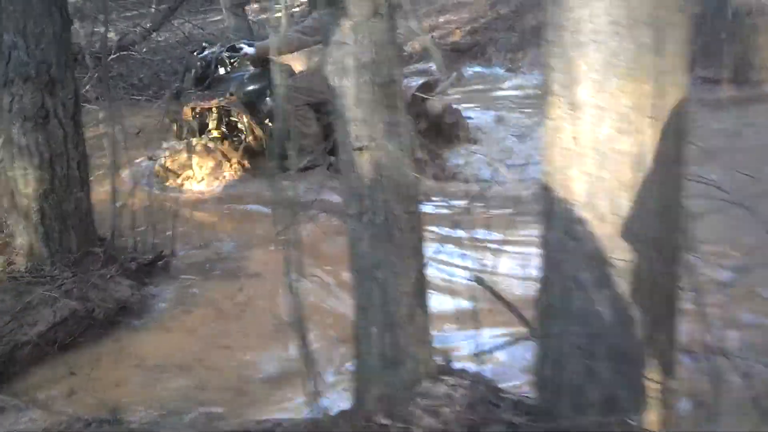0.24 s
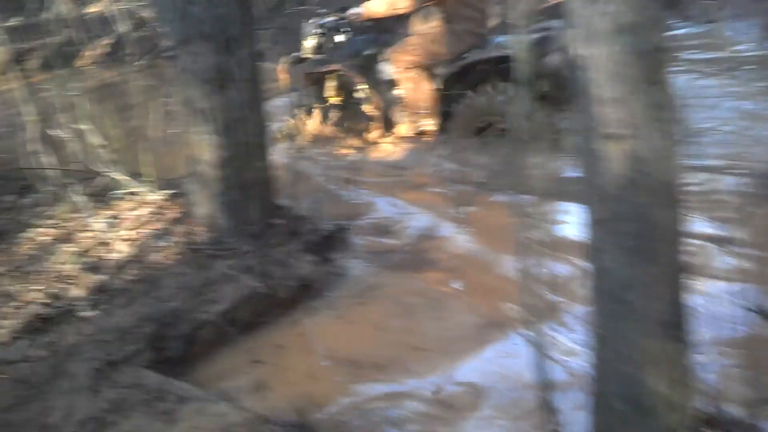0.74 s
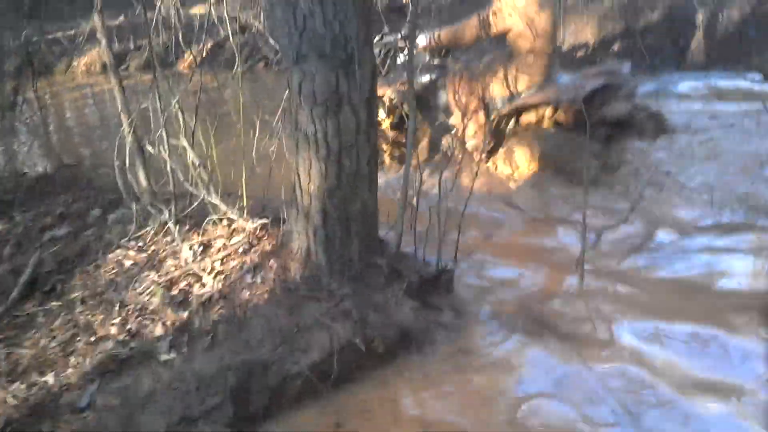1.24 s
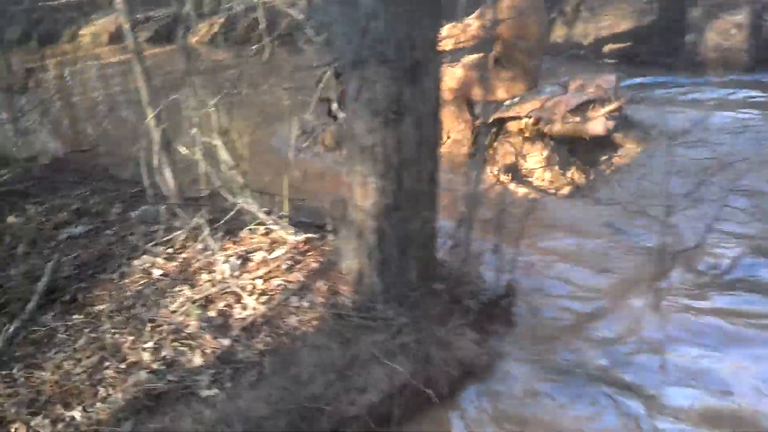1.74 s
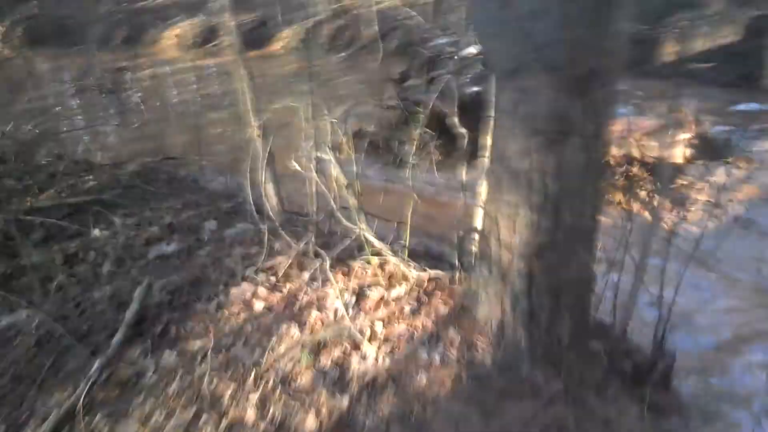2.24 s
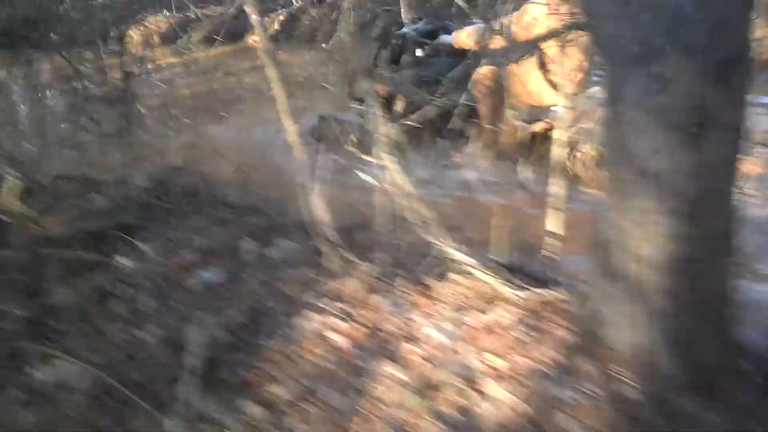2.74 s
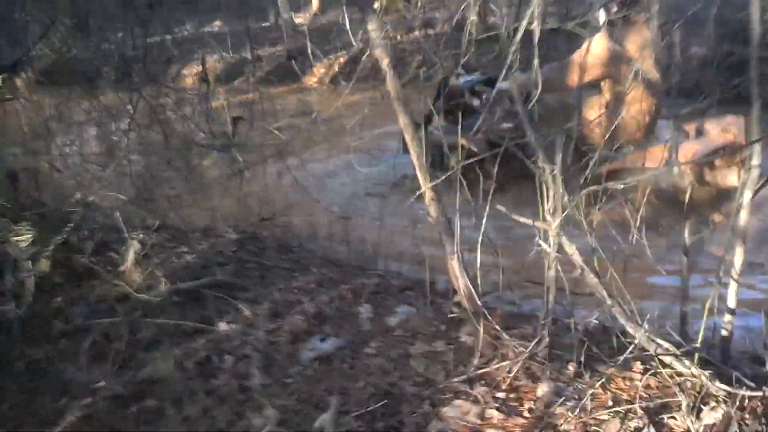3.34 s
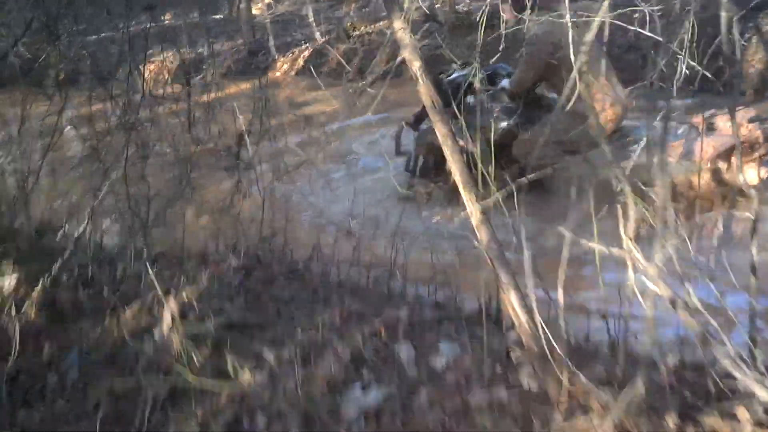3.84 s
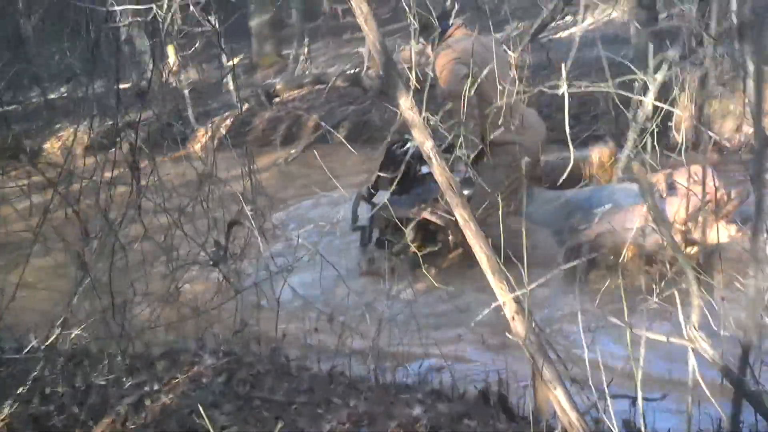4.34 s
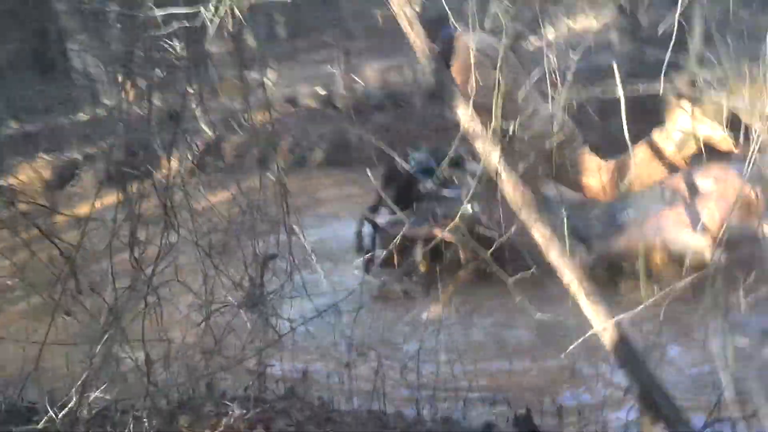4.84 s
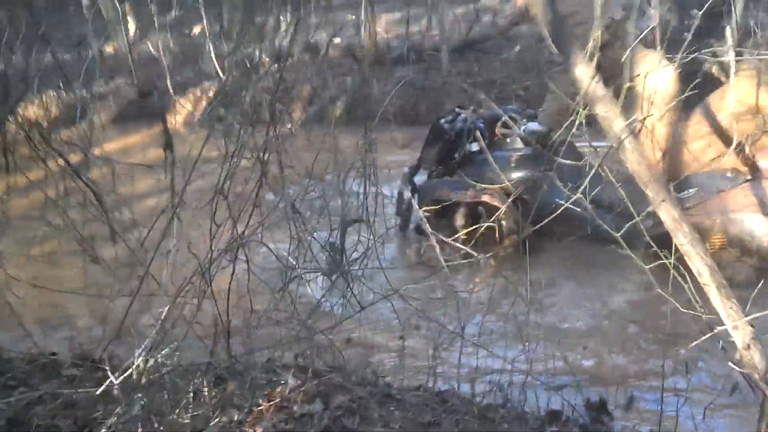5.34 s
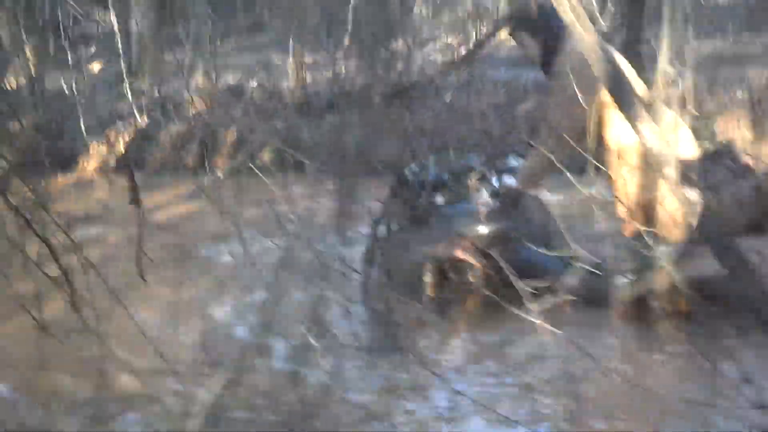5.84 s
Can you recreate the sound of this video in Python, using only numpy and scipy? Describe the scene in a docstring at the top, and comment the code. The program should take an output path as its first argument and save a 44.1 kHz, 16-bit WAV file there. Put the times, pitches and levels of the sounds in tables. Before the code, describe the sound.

A twin-cylinder quad bike wades through a muddy creek, heard from a few metres away. From 0 to 0.9 s the engine growls at middling revs with uneven throttle jabs, a faint thin falling whistle at the very start and a hoarse howl around 0.5-1.2 s. It climbs to a full, throaty roar near 1.2 s, holds until 1.6 s, then drops briefly into a weak burble. At 1.8 s it surges again with wet, crackling spits, roaring highest around 2.4 s. From 2.8 s it winds down, settling by 3.3 s into a slow, lumpy idle with uneven thumps, ticks and spitting water. Sloshing, gurgling and spray show more clearly here, swelling near 3.7 and 5.2 s. From 5.65 s the revs rise again with a gruff growl and heavier slosh to the end. Trees add a faint, short echo.

```python
"""A muddy creek in a wood: a V-twin quad bike wades through, a few metres from two close microphone ports.
The throttle is blipped again and again, the engine drops to a loping idle and picks up again.
Uneven exhaust puffs ring the pipe and spit through mud: summed engine orders, filtered pulses, gated noise.
The wheels churn the water, made of noise and ringing bubbles; the trunks send back a faint echo cloud."""
import sys
import numpy as np
from scipy import signal
from scipy.fft import rfft, irfft
from scipy.io import wavfile
from scipy.ndimage import uniform_filter1d

SR = 44100
rng = np.random.default_rng(int(sys.argv[2]) if len(sys.argv) > 2 else 0)


def output_pcm(signal):
    """Save a mono or channel-first signal as 16-bit PCM at the path in sys.argv[1].

    Samples are clipped to [-1, 1] before scaling.
    """
    pcm = np.clip(np.atleast_2d(signal).T, -1, 1) * 32767
    wavfile.write(sys.argv[1], SR, np.round(pcm).astype(np.int16))


N = 269010

# crank speed before idle hunting: time_s, speed_rpm
CRANK_SPEED = [(0, 2666), (.09, 2614), (.22, 2950), (.38, 2756), (.54, 2587), (.76, 3059), (.92, 2738),
               (1, 3004), (1.23, 3852), (1.49, 3371), (1.64, 3351), (1.72, 2807), (1.81, 2334),
               (1.92, 3150), (2.07, 3828), (2.25, 3678), (2.43, 4027), (2.6, 3614), (2.77, 3308),
               (2.87, 2611), (2.98, 2096), (3.12, 1790), (3.26, 1610), (3.46, 1595), (3.8, 1603),
               (4.1, 1637), (4.4, 1611), (4.8, 1637), (5.37, 1649), (5.65, 1641), (5.78, 1905), (5.9, 2249),
               (6.1, 2441)]
TIME, HZ = np.arange(N) / SR, np.arange(N // 2 + 1) * SR / N
RPM = np.interp(TIME, *np.transpose(CRANK_SPEED))
CYCLE_START = .213  # place in the four-stroke cycle at the start, 0-1
# at idle the crank speed hunts, so that the strokes come a little early or late
HUNT_CYCLES, HUNT_PER_S = .007, 7
# the rider opens the throttle: start_s, end_s, opening (0-1)
BLIPS = [(-.1, 0.867, 0.71), (0.495, 0.747, 0.88), (0.887, 1.613, 0.99), (1.776, 2.765, 0.9),
         (5.62, 6.2, 0.44)]
IDLE_THROTTLE, OPEN_S, CLOSE_S = 0.331, 0.0946, 0.19
# throttle snapped shut, the engine coasts and fires weakly:
# start_s, end_s, recovery_s, overall_loss_db, further_note_loss_db, burble_rise_db
COASTS = [(1.647, 1.849, 0.012, 9.5, 3.5, 16), (2.784, 3.273, 0.25, 5.5, 0.5, 13.5)]
COAST_ONSET_S = 0.063
# the tailpipe blows itself clear of the mud:
# start_s, end_s, strength (ratio), wetness (-1 dry to 1 wet), bark_change_db
SURGES = [(0.035, 0.224, 0.53, 0.34, -3), (0.511, 0.742, 0.41, 0.57, -1.5), (0.92, 1.236, 0.61, 0.89, -9.5),
          (1.39, 1.628, 0.43, 0.6, 3.5), (1.797, 2.071, 0.58, 0.93, 1), (2.184, 2.434, 0.93, 0.72, -1),
          (2.53, 2.785, 0.28, -0.48, 4), (5.632, 6.151, 0.66, 0.11, -3)]
SURGE_ATTACK_S, SURGE_RELEASE_S = 0.067, 0.063
# how the engine runs: start_s, end_s, way (name)
RUNNING = [(-.1, 0.954, "part"), (0.917, 2.788, "full"), (2.786, 2.907, "part"), (2.933, 3.203, "lugging"),
           (3.19, 5.728, "idle"), (5.72, 6.2, "lugging")]
CHANGE_S = 0.074

# gas pulses in one four-stroke cycle, blended by throttle opening:
# place_at_zero (cycles), place_at_full (cycles), level_at_zero_db, level_at_full_db,
# spit_db, extra_hardness_at_zero_db
PUFFS = [(.042, -0.038, 6, -4.5, 4, 8.5), (.198, 0.19, 0.5, -2.5, -14.5, 4), (.365, .347, 4, 1.5, 0, -11.5),
         (.73, .662, 6, -4, -5, -10.5)]
# thrusts of the two cylinders and their returns in the pipe, by way of running, sharpest first:
# place (cycles), relative_level_db
THRUSTS = {"idle": [(.06, 0.5), (.15, -3.5), (.31, -8.5), (.46, -1), (.545, -5.5), (.62, -1.5), (.70, 1)],
           "lugging": [(.07, 0), (.45, 3), (.57, -2.5), (.68, 1.5)], "part": [(.425, -1), (.575, 1),
           (.68, 0), (0.06, -1.5)], "full": [(.43, 2), (0.11, 1), (.58, -2.5), (0.1, -14)]}
# exhaust note, scaled to the same total for each way of running: order (multiple of the cycle rate),
# idle_relative_db, lugging_relative_db, part_throttle_relative_db, full_throttle_relative_db
ORDERS = [(3, -46, -45, -34, -30), (4, -43, -35, -20, -12), (5, -19, -10, -2, -6), (6, -23, -11, -1, 0),
          (7, -20, -10, -12, -7), (8, -8, -6, 0, -10), (9, -11, -4, -3, -15), (10, -14, 1, -4, -10),
          (11, -1, -5, -3, -7), (12, -7, -4, -8, -6), (13, 0, -4, -6, -3), (14, -9, -11, -14, -16),
          (15, -5, -4, -2, -16), (16, -8, -5, -5, -16), (17, -12, -14, -15, -13), (18, -14, -3, -14, -13),
          (19, -12, -7, -17, -13), (20, -12, -10, -16, -16), (21, -9, -13, -13, -13),
          (22, -16, -21, -21, -13), (23, -14, -16, -21, -16), (24, -15, -20, -20, -17),
          (25, -10, -19, -18, -19), (26, -23, -20, -18, -16), (27, -19, -25, -15, -17),
          (28, -23, -23, -16, -19), (29, -21, -29, -18, -23), (30, -28, -17, -16, -24),
          (31, -28, -21, -20, -26), (32, -26, -21, -19, -30)]
# under load the silencer delays the upper orders more and more, so that they fuse into a roar
SMEAR_FROM_ORDER = 14
SMEAR_RAD = {"idle": .012, "lugging": .05, "part": .12, "full": .2}  # radians per order squared
WAVER_DB, WAVER_RAD = .8, .08
HONK_FROM_HZ, HONK_WIDTH_HZ, BASS_CUT_HZ = 224, 25, 81
# the highest orders bark out in a surge; the last value is per surge strength
BARK_FROM_HZ, NOTE_BARK_DB, NOTE_BARK_SURGE_DB = 677, -6, 7.5
# silencer resonances that the orders glide through, swelling and fading: pitch_hz, gain_db
SILENCER = [(110, 0.5), (150, -0.5), (190, 1.5), (220, 2), (250, 0), (325, 1.5), (365, 2.5), (402, 0.5),
            (428, -4), (460, 0.5), (540, 4.5), (620, -0.5), (700, -2), (757, 4.5), (820, 1), (960, -1)]
# resonances of exhaust pipe and silencer: pitch_hz, width_hz, gain_db
PIPE = [(120, 11, -24), (152.6, 26, -7.5), (173, 45, -3), (189, 28, 0.5), (272, 39, -5.5), (336.7, 11, -1),
        (345, 5.7, -4.5), (383, 4.5, -13), (450, 80, -17), (555.5, 11, -6), (596.3, 11.3, -7.5),
        (664, 26, -19), (734.1, 14.7, -6.5), (877, 144, -9.5), (1206, 7.9, -15), (1310, 32, -18),
        (2000, 640, -16.5)]

# exhaust registers, one row each before coasting and surge changes:
# idle_level_db, throttle_rise (db per opening), surge_rise (db per strength), wet_rise (db per wetness)
BOOM_LAW = (-26, 0.5, 4, 0.9)  # the whole note
HONK_LAW = (0, -3, 3.5, -0.5)  # upper orders, relative to the boom
DRONE_LAW = (-40, -8, 10, -9)
BARK_LAW = (-46.5, 2, 12.5, 5)
SNARL_LAW = (-54, 13, 14.5, -7)
RASP_LAW = (-53.5, 17, -9.5, 13)
BURBLE_LAW = (-42, -11, 0, 0)
SPIT_LAW = (-47.5, -12.5, 6, 13.5)
# the gas gets rougher while the crank speeds up hard: the full rise comes at this rate
SPIN_UP_DB, SPIN_UP_RPM_PER_S = 12, 4500
# rushing gas in the pipe, spectrum: pitch_hz, relative_density (db per Hz)
RASP = [(300, -50), (600, -16), (760, 1), (1000, -3), (1350, -4), (1650, -12.5), (2100, -16.5), (2700, 20),
        (5000, -28)]
# a howl flares up near 1.3 kHz and glides: start_s, end_s, start_hz, end_hz, width_hz, level_db
HOWLS = [(0.506, 0.772, 1430, 1356, 189, -34), (0.582, .73, 1220, 1213, 110, -34),
         (.78, 1.03, 1370, 1370, 129, -39), (1.054, 1.21, 1388, 1445, 45, -35.5),
         (5.823, 5.927, 1430, 1460, 70, -45)]
HOWL_RISE_S, HOWL_FALL_S = 0.097, 0.086

# gas tearing through mud, spectrum: pitch_hz, relative_density (db per Hz)
SPIT = [(900, -9.5), (2000, 4), (3200, 3), (4400, 3), (6500, -2.5), (9500, -7), (12000, -12), (16000, -11)]
# the loudest slugs of water blown from the tailpipe: time_s, relative_peak_db
BIG_SLUGS = [(0.171, -38), (0.212, -38.5), (0.657, -38), (0.9793, -31), (1.022, -31.5), (1.536, -36),
             (1.607, -35), (1.855, -28.5), (1.8945, -26), (1.936, -33), (2.327, -31), (2.358, -30.5),
             (3.5187, -43), (3.747, -41), (3.9757, -38.5), (4.263, -38.5), (4.559, -38), (4.8561, -40),
             (4.9283, -38.5), (5.074, -37), (5.435, -43), (5.655, -48), (5.7267, -35.5), (5.8491, -30.5),
             (6.008, -38), (6.0576, -35)]
# smaller slugs follow each cycle's main puff; their peaks stand above the spitting, less so under load
SLUG_LAG_S, SLUG_DB, SLUG_LOAD_DB, SLUG_SPREAD_DB = 0.0016, 10, -31, 8
# water slugs, spectrum: pitch_hz, relative_density (db per Hz)
CRACK = [(300, -40), (800, 8), (2000, 8.5), (3200, 1.5), (4400, 1), (6500, -2), (9500, -5.5), (12000, -13),
         (16000, -13)]
# thin whistles: start_s, end_s, start_hz, end_hz, level_db, waver_hz
WHISTLES = [(-.05, 0.144, 500, 420, -29.5, 6.8)]

# churned water: level at idle and change per throttle opening
SLOSH_DB, SLOSH_LOAD_DB = -43.5, 5
SPRAY_DB, SPRAY_LOAD_DB = -54.5, 1.5
# the bow wave breaks: start_s, end_s, slosh_change_db, spray_change_db
WAVES = [(3.65, 3.82, 4.5, 8), (5.115, 5.438, 0.7, 9), (5.613, 6.1, 6.5, -10)]
WAVE_RISE_S, WAVE_FALL_S = 0.18, 0.2
# mud flung up by the wheels lands: time_s, relative_level_db, decay_s
SPLATS = [(0.127, -70.5, 0.024), (3.84, -72, 0.0095), (3.976, -65, 0.015), (5.33, -72, 0.033),
          (5.63, -74, 0.026)]
# sloshing water, spectrum: pitch_hz, relative_density (db per Hz)
SLOSH = [(20, -32), (60, -11), (150, -42), (400, 6), (750, 1.5), (1200, -4), (2200, -13), (4000, -21),
         (9000, -45)]
# spray and mud, spectrum: pitch_hz, relative_density (db per Hz)
SPRAY = [(1000, -24), (2500, -12), (4400, 3.5), (7000, -3), (9500, -0.5), (12000, -8), (16000, -1)]

# microphone pair, lead of the left side on top of the port lag: pitch_hz, phase (radians)
SKEW = [(20, 0), (130, -.25), (330, .42), (420, .6), (500, 1.05), (585, 3.1), (650, 3.5), (700, 4),
        (1000, 3.8), (1500, 2.85), (1620, 3.8), (1850, 3.9), (2100, 2.7), (2500, 3.3), (2800, 3.14)]
# microphone pair: pitch_hz, left_minus_right_db
BALANCE = [(70, 3), (140, .8), (210, .5), (330, 2.2), (500, 5), (770, 3), (1170, .3), (1800, -1.2),
           (2800, -.3), (4200, -.8), (7000, 0)]
PORT_LAG_S = .000362
CUTOFF_HZ = 16000


def throttle_opening():
    """The throttle rests at idle between blips."""
    blips = [(opening - IDLE_THROTTLE) * swell(start, end, OPEN_S, CLOSE_S)
             for start, end, opening in BLIPS]
    return np.clip(IDLE_THROTTLE + np.max(blips, axis=0), 0, 1)


def loudness(load):
    """Register levels in dB follow load and surges; while coasting the note gives way to burble."""
    strength, wetness, bark_db = sum(
        np.outer(amounts, swell(start, end, SURGE_ATTACK_S, SURGE_RELEASE_S))
        for start, end, *amounts in SURGES)
    loss_db, note_loss_db, burble_db = sum(
        np.outer(db, swell(start, end, COAST_ONSET_S, recovery_s))
        for start, end, recovery_s, *db in COASTS)
    laws = (BOOM_LAW, DRONE_LAW, BARK_LAW, SNARL_LAW, RASP_LAW, SPIT_LAW, BURBLE_LAW, HONK_LAW)
    boom, drone, bark, snarl, rasp, spitting, burbling, honk = [
        idle_db + load_db * load + surge_db * strength + wet_db * wetness - loss_db
        for idle_db, load_db, surge_db, wet_db in laws]
    spin_up = np.clip(np.gradient(RPM) * SR / SPIN_UP_RPM_PER_S, 0, 1)
    burbling = burbling + burble_db + SPIN_UP_DB * spin_up
    note_bark_db = NOTE_BARK_DB + NOTE_BARK_SURGE_DB * strength + bark_db
    # honk is relative to the boom, which already carries the coasting loss
    return (boom - note_loss_db, honk + loss_db, note_bark_db, burbling,
            drone, bark + bark_db, snarl, rasp, spitting)


def firing(cycle, throttle, uneven_db, spit_uneven_db, jitter_s):
    """Pressure pulses, their hard fronts and gas jets; throttle shifts their places and sizes."""
    pressure, fronts, jets = np.zeros((3, N))
    count = np.arange(int(cycle[-1]) + 1)
    opening = np.interp(count, cycle, throttle)
    for idle_place, load_place, idle_db, load_db, spit_db, hard_db in PUFFS:
        chance = rng.standard_normal((len(count), 3))
        place = (1 - opening) * idle_place + opening * load_place
        when = np.interp(count + place, cycle, TIME, left=-1, right=-1)
        when = when + jitter_s * (1 - opening) * chance[:, 0]
        size = (1 - opening) * from_db(idle_db) + opening * from_db(load_db)
        size = size * from_db(uneven_db * chance[:, 1])
        pressure += clicks(when, size)
        fronts += clicks(when, size * from_db(hard_db * (1 - opening)))
        jets += clicks(when, from_db(spit_db + spit_uneven_db * chance[:, 2]))
    return pressure, fronts, jets


def order_phasors(soft_order):
    """Thrust places set the phase of each order, one set of complex orders per way of running."""
    orders, *columns = np.transpose(ORDERS)
    notes = []
    for (way, thrusts), db in zip(THRUSTS.items(), columns):
        hard, *soft = [from_db(size_db) * np.exp(-2j * np.pi * orders * place)
                       for place, size_db in thrusts]
        # softer thrusts matter less in the upper orders
        timing = np.angle(hard + sum(soft) * np.exp(-(orders / soft_order) ** 2))
        timing = timing - SMEAR_RAD[way] * np.maximum(orders - SMEAR_FROM_ORDER, 0) ** 2
        notes.append(from_db(db) / np.linalg.norm(from_db(db)) * np.exp(1j * timing))
    return orders, np.transpose(notes)


def exhaust_note(cycle, boom_db, honk_db, bark_db, soft_order):
    """Wavering engine orders crossfade with the way of running; surges lift the upper ones."""
    orders, notes = order_phasors(soft_order)
    shares = np.array([sum(swell(start, end, CHANGE_S, CHANGE_S)
                           for start, end, way in RUNNING if way == name) for name in THRUSTS])
    out, turn = 0, np.exp(2j * np.pi * cycle)
    wave = turn ** int(orders[0])
    for order, note in zip(orders, notes):
        hz = order * RPM / (2 * 60)  # one cycle takes two crank turns
        upper = np.clip((hz - HONK_FROM_HZ) / HONK_WIDTH_HZ, 0, 1)
        highest = np.clip((hz - BARK_FROM_HZ) / HONK_WIDTH_HZ, 0, 1)
        passing_db = np.interp(hz, *np.transpose(SILENCER))
        gain = from_db(upper * honk_db + highest * bark_db + passing_db + WAVER_DB * drift(14))
        gain = gain / np.sqrt(1 + (BASS_CUT_HZ / hz) ** 10)
        out = out + gain * ((note @ shares) * wave * (1 + 1j * WAVER_RAD * drift(14))).real
        wave = wave * turn
    return np.sqrt(2) * from_db(boom_db) * out


def ring_pipe(x):
    """The resonances of pipe and silencer."""
    return sum(resonate(x, hz, width) * from_db(db) for hz, width, db in PIPE)


def exhaust(cycle, pressure, fronts, jets, throttle, levels_db, baffle_share, rush_db):
    """The hard fronts of the pulses rattle between the baffles and mix with rushing gas."""
    hard = ring_pipe(fronts)
    rattle = -.5 * hard + baffle_share * (.4 + .6 * throttle) * scatter(hard, decay_s=.009)
    flow = fade(jets, decay_s=0.0068) + throttle * fade(pressure, decay_s=0.042) + 0.063
    rush = colour(rng.standard_normal(N) * flow, RASP)
    bands_hz = [(495, 677), (690, 852), (930, 1530), (1530, 2304)]  # drone, bark, snarl, rasp
    out = 0
    for (low_hz, high_hz), level_db, noise_db in zip(bands_hz, levels_db, rush_db):
        tone = even(band(rattle, low_hz, high_hz), cycle)
        noise = even(band(rush, low_hz, high_hz), cycle)
        out = out + from_db(level_db) * even(tone + from_db(noise_db) * noise, cycle)
    return out


def burble(cycle, pressure, level_db):
    """Loose, uneven gusts of gas keep the pipe ringing between the firings."""
    gusts = rng.standard_normal(N) * (fade(pressure, decay_s=0.02) + .3)
    return from_db(level_db) * even(band(ring_pipe(gusts), 104, 590), cycle)


def howl(cycle, pressure, start, end, start_hz, end_hz, width_hz, level_db):
    """A narrow, gliding resonance, rung by the engine's pulses and the gas that follows them."""
    hz = np.interp(TIME, [start, end], [start_hz, end_hz])
    turn = np.exp(2j * np.pi * np.cumsum(hz) / SR)
    drive = pressure + 0.081 * rng.standard_normal(N) * fade(pressure, decay_s=0.0087)
    ring_s = 1 / (np.pi * width_hz)
    # shift down to 0 Hz, smooth twice, shift back up
    tone = (fade(fade(drive / turn, ring_s), ring_s) * turn).real
    return from_db(level_db) * swell(start, end, HOWL_RISE_S, HOWL_FALL_S) * even(tone, cycle)


def spit(cycle, jets, throttle, delay_s, grain_db, leak):
    """Each jet tears through wet mud: a tick at idle, a longer crackling burst under load."""
    tick = rms_one(fade(fade(jets, decay_s=0.00055), decay_s=0.0069))
    crackle = rms_one(fade(jets, decay_s=0.0084))
    burst = tick + (0.32 + throttle) * 0.42 * crackle
    gate = np.interp(TIME - delay_s, TIME, burst) + leak
    grains = rng.standard_normal(N) * gate * from_db(grain_db * drift(770))
    return even(colour(grains, SPIT), cycle)


def cracks(cycle, load, spit_db, level_db, snap_s, tail_s, tail_db):
    """Water slugs leave the tailpipe with a snap and short hiss: small every cycle, big now and then."""
    count = np.arange(1, int(cycle[-1]) + 1)
    small_s = np.interp(count + PUFFS[0][0], cycle, TIME) + SLUG_LAG_S
    chance = np.minimum(rng.standard_normal(len(count)), 1)
    small = clicks(small_s, from_db(SLUG_DB + SLUG_SPREAD_DB * chance))
    small = small * from_db(spit_db + SLUG_LOAD_DB * load)
    when, peak_db = np.transpose(BIG_SLUGS)
    slugs = small + clicks(when, from_db(peak_db + level_db))
    envelope = fade(slugs, snap_s) + from_db(tail_db) * fade(slugs, tail_s)
    return colour(rng.standard_normal(N), CRACK) * envelope


def whistle(start, end, start_hz, end_hz, level_db, waver_hz):
    """A thin, wavering tone that glides."""
    hz = np.interp(TIME, [start, end], [start_hz, end_hz]) + waver_hz * drift(154)
    level = from_db(level_db + 1.6 * drift(77.0)) * swell(start, end, attack_s=0.046, release_s=0.03)
    return level * np.sin(2 * np.pi * np.cumsum(hz) / SR)


def bubbles(per_s, low_hz, high_hz, cycles, spread_db):
    """Bubbles and droplets of random size, each ringing for a few cycles or less."""
    born = rng.random(N) < per_s / SR
    sizes = from_db(spread_db * np.minimum(rng.exponential(1, N), 4))
    sizes = born * sizes * rng.choice([-1, 1], N)
    dealt = rng.integers(0, 14, N)  # each one gets one of 14 pitches
    pitches = np.geomspace(low_hz, min(high_hz, .4 * SR), 14)
    return rms_one(sum(resonate(sizes * (dealt == k), hz, hz / cycles) / np.sqrt(hz)
                       for k, hz in enumerate(pitches)))


def water(load, splat_db):
    """The bow wave sloshes and gurgles; spray and lumps of mud patter down."""
    slosh_change_db, spray_change_db = sum(
        np.outer(change_db, swell(start, end, WAVE_RISE_S, WAVE_FALL_S))
        for start, end, *change_db in WAVES)
    slosh_db = SLOSH_DB + SLOSH_LOAD_DB * load + slosh_change_db
    spray_db = SPRAY_DB + SPRAY_LOAD_DB * load + spray_change_db
    gurgle = .25 * bubbles(per_s=700, low_hz=400, high_hz=1500, cycles=8, spread_db=2.5)
    slosh = from_db(slosh_db + 1.0 * drift(18)) * (colour(rng.standard_normal(N), SLOSH) + gurgle)
    drops = bubbles(per_s=2500, low_hz=2530, high_hz=14900, cycles=0.72, spread_db=-3.0)
    spray = colour(rms_one(rng.standard_normal(N)) + 1.2 * drops, SPRAY)
    splats = sum(fade(clicks([s], from_db([db + splat_db])), decay) for s, db, decay in SPLATS)
    return slosh + (from_db(spray_db + 0.27 * drift(33)) + splats) * spray


def tree_trunks(near):
    """The trunks return a dying cloud of echoes, different on each side."""
    return np.array([scatter(band(near, 260, 15000), decay_s=.035) for side in range(2)])


def microphones(x, ripple):
    """Two close ports: the left one leads, by a phase that grows unevenly with frequency."""
    travel = 2 * np.pi * HZ * PORT_LAG_S
    lead = travel + over_hz(SKEW) - ripple * np.sin(2 * travel)
    tilt = from_db(over_hz(BALANCE) / 2)
    return irfft(rfft(x) * np.array([tilt, np.exp(-1j * lead) / tilt]), N)


def from_db(db):
    """Decibels to gain."""
    return 10 ** (np.asarray(db) / 20)


def rms_one(x):
    """Scale to rms 1."""
    return x / np.sqrt(np.mean(x ** 2) + 1e-20)


def over_hz(points):
    """A short spectrum joined up on a log-frequency axis."""
    hz, value = np.transpose(points)
    return np.interp(np.log(HZ + 1), np.log(hz), value)


def colour(x, spectrum):
    """Filter a sound by a spectrum; rms 1."""
    return rms_one(irfft(rfft(x) * from_db(over_hz(spectrum)), N))


def band(x, low_hz, high_hz):
    """Band-pass that keeps pulses in place."""
    return signal.sosfiltfilt(signal.butter(3, [low_hz, high_hz], "band", fs=SR, output="sos"), x)


def resonate(x, hz, width_hz):
    """One resonance with gain 1 on top."""
    r = np.exp(-np.pi * width_hz / SR)
    feed = np.array([1, 0, -1]) * (1 - r * r) / 2
    return signal.lfilter(feed, [1, -2 * r * np.cos(2 * np.pi * hz / SR), r * r], x + 1e-18)


def fade(x, decay_s):
    """Every click becomes an exponential decay of the same height."""
    return signal.lfilter([1], [1, -np.exp(-1 / (decay_s * SR))], x + 1e-18)


def drift(rate):
    """Slow chance with a spread of about 1, from rate random points per second."""
    return np.interp(TIME * rate, np.arange(8000), rng.standard_normal(8000))


def clicks(times, sizes):
    """Single-sample clicks at the given times."""
    at = np.round(np.asarray(times) * SR).astype(int)
    return np.bincount(np.clip(at, 0, N - 1), sizes * ((at >= 0) & (at < N)), N)


def scatter(x, decay_s):
    """A dense cloud of dying echoes that keeps the energy."""
    t = TIME[:SR // 2]
    echoes = rng.standard_normal(len(t)) * np.exp(-t / decay_s)
    return signal.fftconvolve(x, echoes / np.sqrt(np.sum(echoes ** 2)))[:N]


def even(x, cycle):
    """Hold the power per engine cycle near 1, leaving the shape within each cycle."""
    energy = np.cumsum(x ** 2)
    start, end = [np.interp(cycle + half, cycle, np.arange(N)) for half in (-.5, .5)]
    power = (energy[end.astype(int)] - energy[start.astype(int)]) / (end - start)
    return x / np.sqrt(uniform_filter1d(power, SR // 25) + 1e-20)


def swell(start, end, attack_s, release_s):
    """Rise from start, hold at 1 until end, then fall."""
    return np.clip(np.minimum((TIME - start) / attack_s, 1 - (TIME - end) / release_s), 0, 1)


def scene():
    """Engine and water, with a faint return from the tree trunks."""
    throttle = throttle_opening()
    load = throttle - IDLE_THROTTLE
    hunting = HUNT_CYCLES * drift(HUNT_PER_S) * np.clip(1 - 2 * load, 0, 1)
    cycle = CYCLE_START + np.cumsum(RPM) / (2 * 60 * SR) + hunting
    boom_db, honk_db, note_bark_db, burble_db, *levels_db, spit_db = loudness(load)
    pressure, fronts, jets = firing(cycle, throttle, uneven_db=3.5, spit_uneven_db=4.0,
                                    jitter_s=0.00029)
    engine = exhaust_note(cycle, boom_db, honk_db, note_bark_db, soft_order=24.9)
    engine = engine + exhaust(cycle, pressure, fronts, jets, throttle, levels_db,
                              baffle_share=1.0, rush_db=[-12, -13, -2, 0.0])
    engine = engine + burble(cycle, pressure, burble_db)
    engine = engine + sum(howl(cycle, pressure, *row) for row in HOWLS)
    spitting = spit(cycle, jets, throttle, delay_s=0.0012, grain_db=1.0, leak=0.082)
    engine = engine + from_db(spit_db) * spitting
    slugs = cracks(cycle, load, spit_db, level_db=6.5, snap_s=.0011, tail_s=0.0058, tail_db=-8.5)
    whistles = sum(whistle(*row) for row in WHISTLES)
    near = engine + slugs + whistles + water(load, splat_db=32.0)
    return microphones(near, ripple=.2) + from_db(-15) * tree_trunks(near)


def record(dry):
    """The top is cut steeply by an elliptic low-pass."""
    return signal.sosfilt(signal.ellip(10, .2, 70, CUTOFF_HZ, fs=SR, output="sos"), dry)


dry = scene()
out = record(dry)
output_pcm(out)
```